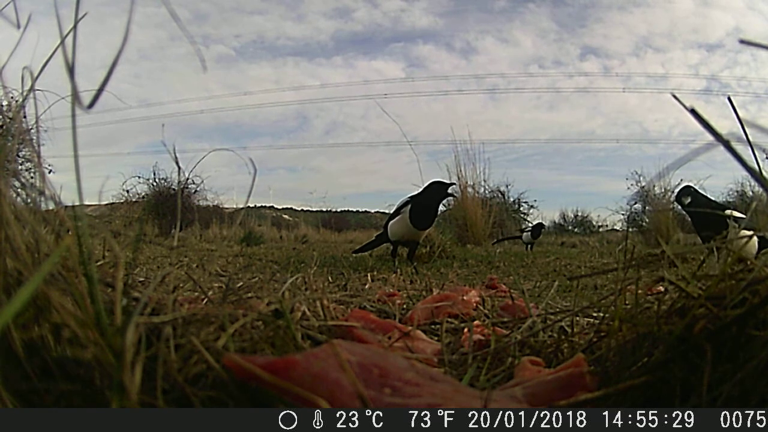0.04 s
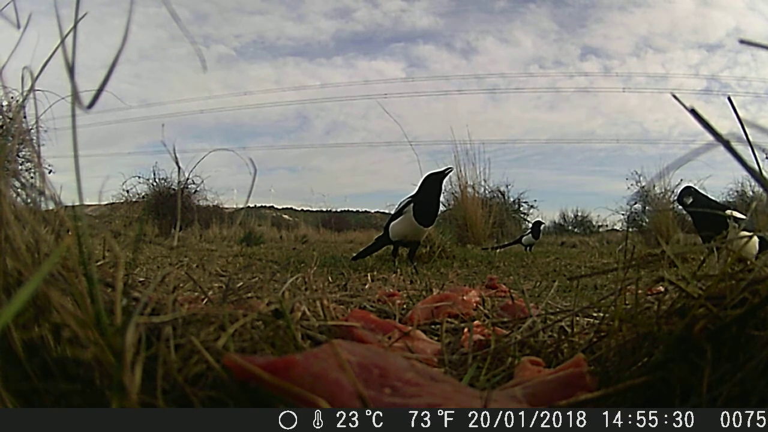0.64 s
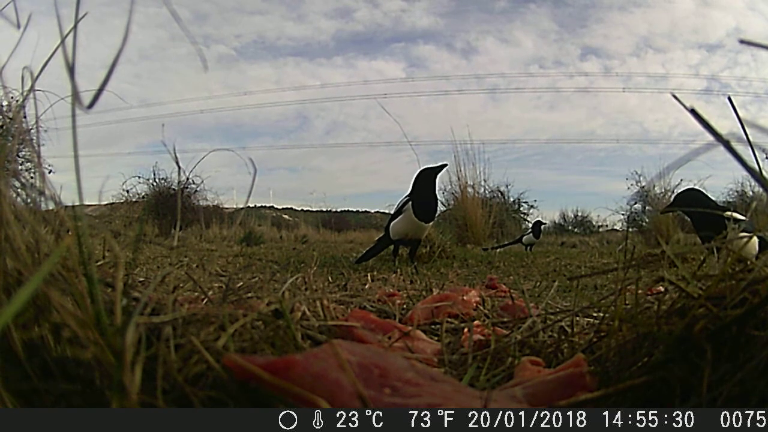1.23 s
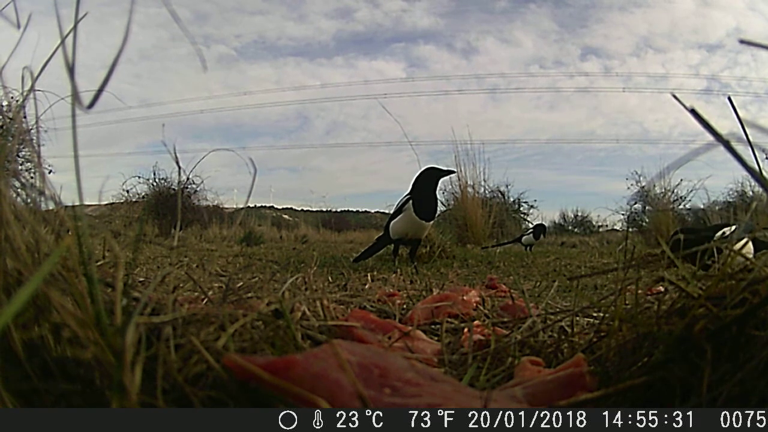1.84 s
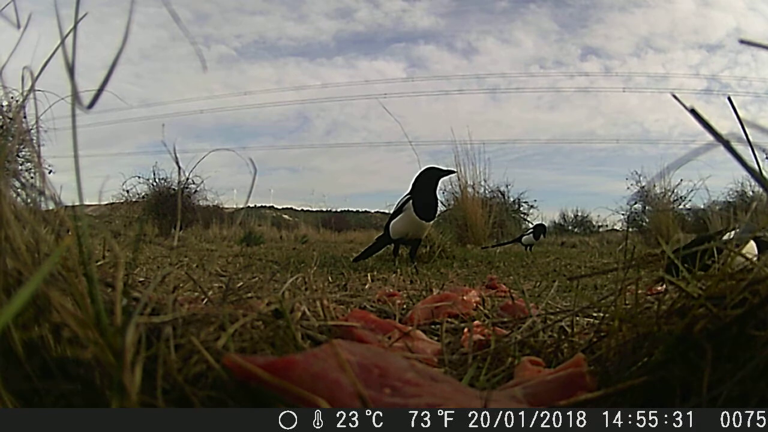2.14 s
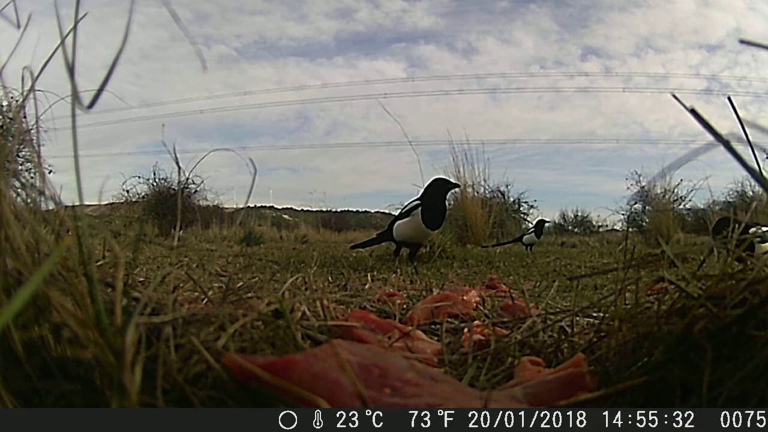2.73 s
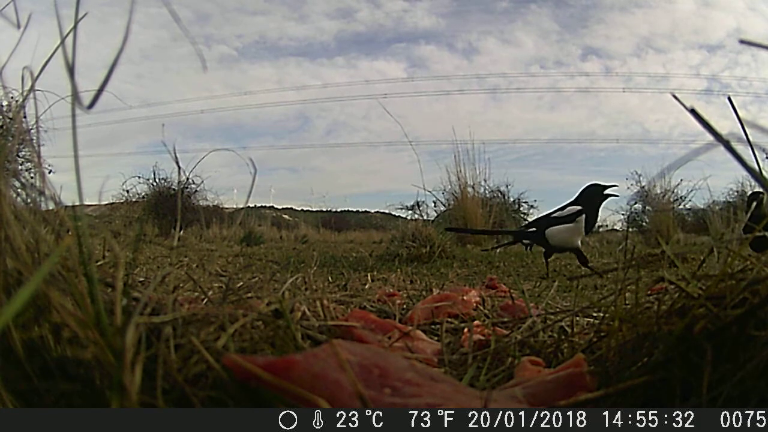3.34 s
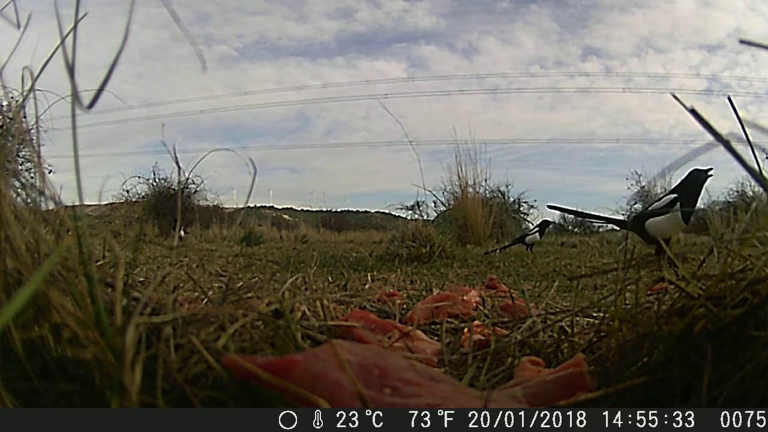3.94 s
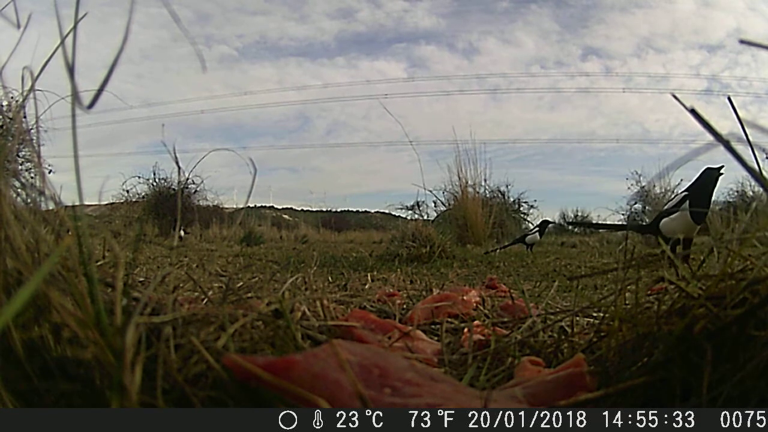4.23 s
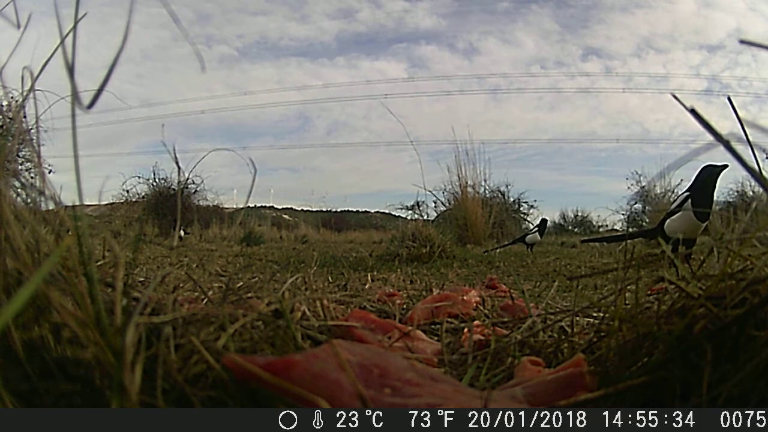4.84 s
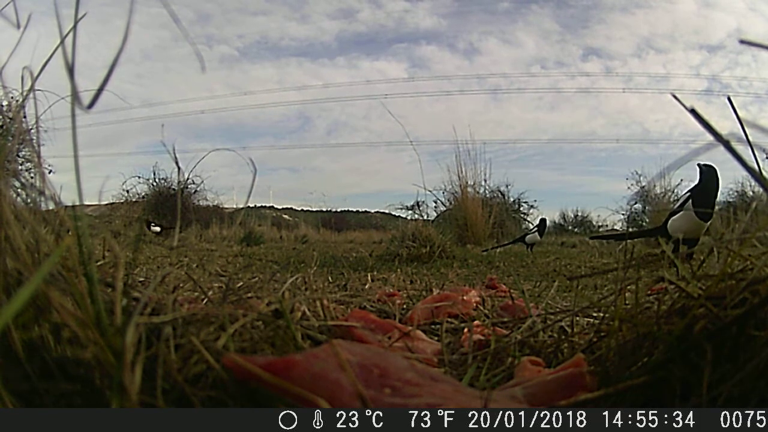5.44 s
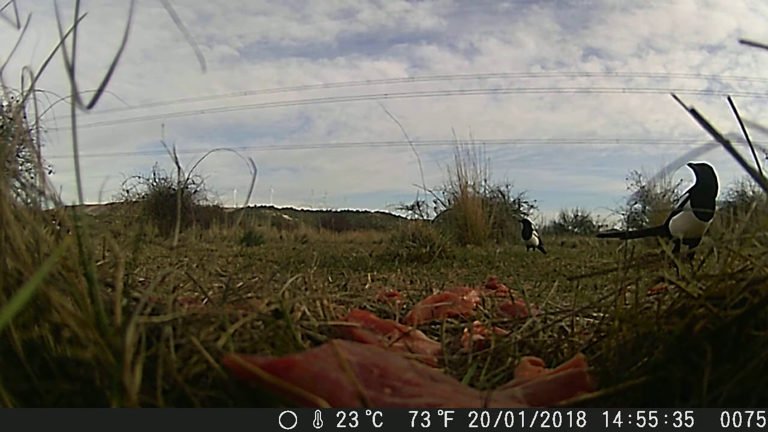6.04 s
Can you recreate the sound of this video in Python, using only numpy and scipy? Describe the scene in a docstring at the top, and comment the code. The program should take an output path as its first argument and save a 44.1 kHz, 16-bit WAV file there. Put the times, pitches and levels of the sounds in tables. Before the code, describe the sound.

Close, raspy magpie chatter comes in two rapid runs, the second longer, with only faint hiss and hum between them.

```python
"""Magpie in an open field

A magpie chatters close to a trail camera lying in the grass. Each note is a harsh rasp: uneven pulses
from the syrinx excite the resonances of throat and beak. Far bushes return faint echoes, and dry
stalks tick underfoot. The camera adds its own hiss, a low hum, and a soft fizzing tick five times
a second as it stores data."""
import sys
import numpy as np
from scipy import signal
from scipy.fft import rfft, irfft
from scipy.io import wavfile
from scipy.ndimage import uniform_filter1d

SR = 44100
rng = np.random.default_rng(int(sys.argv[2]) if len(sys.argv) > 2 else 0)


def inscribe(sig):
    """Save sig as 16-bit PCM at rate SR to the path in sys.argv[1].

    A 1-D sig is mono; a 2-D sig holds one channel per row.
    Samples are clipped to [-1, 1] before scaling.
    """
    pcm = np.round(np.clip(np.atleast_2d(sig).T, -1, 1) * 32767)
    wavfile.write(sys.argv[1], SR, pcm.astype(np.int16))


N = 268634

# Spectral density of the hiss and rumble: f/Hz, level/dB
HISS_SPECTRUM = [(12, -76), (30, -76), (55, -86), (110, -91.5), (250, -99), (500, -103.5), (1000, -108),
                 (2600, -112), (3200, -121), (3600, -119), (5200, -123), (6600, -120), (7330, -111.5),
                 (7900, -123), (8700, -133)]
# Hum at harmonics of the camera's picture rate: f/Hz, level/dB
HUM_PARTIALS = [(30, -70), (60, -79), (90, -78), (120, -87.5), (150, -88.5), (180, -93), (210, -89),
                (270, -88.5)]
# Spectral peaks of the fizz while data is stored: f/Hz, width/Hz, gain/dB
FIZZ_PEAKS = [(3600, 500, -14.5), (4030, 98, -16.5), (4390, 170, -6.5), (5020, 140, -13),
              (5560, 190, -11.5), (7100, 280, -7.5), (7340, 220, 3), (8550, 360, -16)]
# Dry grass ticking under the bird's feet: t/s, level/dB
STALK_TICKS = [(1.479, -75.5), (5.047, -71), (5.066, -74), (5.145, -74), (5.236, -72)]
# Echoes from the bushes: delay/s, gain/dB
BUSH_ECHOES = [(.056, -24.5), (.143, -27.5)]
# Bands that the bushes reflect: f/Hz, width/Hz, gain/dB
BUSH_BANDS = [(750, 300, -10.5), (1410, 360, -1), (2226, 120, 7), (2690, 120, -6), (4500, 2700, -10.5)]
# The echoes grow as the bird walks off and turns away: t/s, gain/dB
ECHO_GROWTH = [(3.6, -4), (4.44, 1.5)]
# Bands cancelled by reflections off the ground and the housing: f/Hz, width/Hz
NOTCHES = [(1600, 170), (3200, 237), (6400, 520)]
# Fixed resonances of throat and beak: f/Hz, width/Hz, gain/dB
FORMANTS = [(665, 120, -9), (785, 100, -5.5), (1080, 100, -17), (1295, 130, -4.5), (1765, 80, -12),
            (1950, 110, -10.3), (2195, 90, -6.5), (2450, 170, -3), (2880, 240, -4), (3450, 400, -12),
            (4160, 100, -14.5), (4520, 380, -14.5), (4850, 100, -16), (5080, 150, -14), (5500, 350, -19.5),
            (5980, 340, -14), (6700, 380, -12.5), (7400, 480, -16), (8300, 260, -29)]
# How the beak is held: t/s, main resonance f/Hz, gain of the low chest tones/dB
BEAK_POSTURE = [(.17, 2790, -1.9), (3.07, 2800, -2.4), (3.16, 2500, -1.3), (3.36, 2490, -4),
                (3.66, 2740, -2.5), (3.84, 2534, -5.5), (4.2, 2490, -5.5)]
# Treble as the bird moves its head: t/s, brightness/dB, further gain at the top edge/dB
HEAD_TREBLE = [(.5, 4, -1), (2.9, -1, -3.5), (3.16, 1.5, -7), (3.36, -5, -5.5), (3.56, -6.5, -7),
               (3.74, -1.1, -4), (3.84, -4, -0.5), (4.2, -2.5, -3)]
# Chest tones come sooner and linger, treble goes first: lower edge f/Hz, attack exponent, release/length
REGISTER_ENVELOPES = [(0, 0.71, 0.25), (1600, 0.9, 0.19), (3200, 0.97, 0.17)]
# Notes of the chatter: envelope peak t/s, length/s, level/dB
CHATTER = [(-.015, 0.062, -43.5), (.079, 0.065, -45.5), (.172, 0.064, -46.5), (.245, 0.062, -64),
           (0.326, .066, -63.5), (.413, 0.057, -62.5), (0.511, 0.072, -63), (2.91, 0.061, -49.5),
           (2.991, 0.063, -48), (3.075, 0.073, -49.5), (3.163, 0.065, -48.5), (3.253, .069, -48),
           (3.361, .06, -47), (3.399, .035, -65), (3.471, 0.067, -65), (3.557, 0.068, -51.5),
           (3.645, 0.069, -48.5), (3.741, .068, -47.5), (3.84, .069, -45), (3.904, 0.053, -64),
           (4.037, 0.063, -47), (4.126, 0.069, -45), (4.222, 0.069, -44.5), (4.324, .067, -44),
           (4.442, 0.067, -44.5)]


def gain_of(db):
    """Amplitude ratio of a level in decibels."""
    return 10 ** (np.asarray(db) / 20)


def unit_rms(x):
    """Normalisation to an rms of 1."""
    return x / np.sqrt(np.mean(x ** 2) + 1e-20)


def spectrum_gain(points, hz):
    """Amplitude from levels interpolated on a logarithmic frequency axis."""
    f, db = np.transpose(points)
    return gain_of(np.interp(np.log(hz + 1), np.log(f + 1), db))


def follow(curve, s):
    """Linear interpolation of each column of a control curve at time s."""
    times, *columns = np.transpose(curve)
    return [np.interp(s, times, column) for column in columns]


def add(mix, s, sound):
    """Superposition of a sound on the mix, starting at time s."""
    start = round(s * SR)
    sound = sound[max(-start, 0):]
    part = mix[max(start, 0):][:len(sound)]
    part += sound[:len(part)]


def resonances(modes, hz):
    """Gain of steep-sided resonances whose powers add."""
    powers = (gain_of(db) ** 2 / (1 + ((hz - f) / (.78 * width)) ** 2) ** 2 for f, width, db in modes)
    return np.sqrt(sum(powers))


def colour(x, gain_at, size=4096):
    """Minimum-phase filter of gain gain_at(f): it rings after each pulse, never before."""
    hz = abs(np.fft.fftfreq(size, 1 / SR))
    log_gain = np.log(np.maximum(gain_at(hz), 1e-5))
    taps = np.fft.ifft(np.exp(np.conj(signal.hilbert(log_gain)))).real
    return signal.fftconvolve(x, taps[:size // 2])[:len(x)]


def wobble(samples, rate_hz):
    """Random fluctuation of rms 1, low-passed near rate_hz."""
    hz = np.fft.rfftfreq(samples, 1 / SR)
    return unit_rms(irfft(rfft(rng.standard_normal(samples)) * np.exp(-(hz / rate_hz) ** 2), samples))


def hiss_and_hum(hiss_db=-.2, waver_db=.25, whine_hz=6335, whine_db=-98):
    """A continuous noise spectrum from air and microphone, plus spectral lines of hum and whine."""
    hz, t = np.fft.rfftfreq(N, 1 / SR), np.arange(N) / SR
    noise = irfft(rfft(rng.standard_normal(N)) * spectrum_gain(HISS_SPECTRUM, hz), N) * np.sqrt(SR / 2)
    tones = sum(np.sqrt(2) * gain_of(db) * np.sin(2 * np.pi * (f * t + rng.random()))
                for f, db in HUM_PARTIALS + [(whine_hz, whine_db)])
    return noise * gain_of(hiss_db + waver_db * wobble(N, 6)) + tones


def data_bursts(first_s=.186, period_s=.2, pip_hz=4420, pip_decay_s=.0037,
                fizz_db=-77, pip_db=-76, sag_db=-52):
    """Periodic loading: each write pips, fizzes and pulls down the supply, which then swings back."""
    busy, pips, t = np.zeros(N), np.zeros(N), np.arange(SR // 20) / SR
    for s in np.arange(first_s - period_s, N / SR, period_s):
        length_s = (.037 if 4.5 < s < 5.1 else .066) + .008 * rng.uniform(-1.1, 1)
        add(busy, s, np.ones(int(SR * length_s)))
        add(pips, s, np.sin(2 * np.pi * pip_hz * t) * np.exp(-t / pip_decay_s))
    noise = unit_rms(colour(rng.standard_normal(N), lambda hz: resonances(FIZZ_PEAKS, hz)))
    fizz = uniform_filter1d(busy, size=200) * noise
    supply_response = signal.butter(1, [4.6, 16], "band", fs=SR, output="sos")
    sag = signal.sosfilt(supply_response, -uniform_filter1d(busy, size=500))
    return gain_of(fizz_db) * fizz + gain_of(pip_db) * pips + gain_of(sag_db) * unit_rms(sag)


def grass_ticks(decay_s=.007):
    """Broadband transients: dry stalks give tiny bright crackles that decay exponentially."""
    out, t = np.zeros(N), np.arange(SR // 20) / SR
    crisp = [(2000, -14), (4400, -12.5), (6200, -15), (7400, 1), (8500, -20.5)]  # f/Hz, gain/dB
    envelope = t / decay_s * np.exp(1 - t / decay_s)
    for s, db in STALK_TICKS:
        snap = unit_rms(colour(rng.standard_normal(len(t)), lambda hz: spectrum_gain(crisp, hz)))
        add(out, s - decay_s / 2, gain_of(db) * snap * envelope)
    return out


def field_echoes(x, scatter_s=.003, wash_db=-35, t60_s=.28):
    """Diffuse reflection: bushes return dull, smeared echoes over a thin wash from the grass."""
    t = np.arange(SR // 2) / SR
    response = gain_of(wash_db - 60 * t / t60_s) * rng.standard_normal(len(t))
    response *= np.sqrt(np.log(1e6) / t60_s / SR)  # wash energy independent of decay time
    for delay, db in BUSH_ECHOES:
        twigs = rng.standard_normal(len(t)) * np.exp(-t / scatter_s)
        add(response, delay, gain_of(db) * ((t == 0) + .5 * twigs / np.linalg.norm(twigs)))
    incident = x * gain_of(follow(ECHO_GROWTH, np.arange(N) / SR)[0])
    return colour(signal.fftconvolve(incident, response)[:N], lambda hz: resonances(BUSH_BANDS, hz))


def through_grass(x, scatter_db=-2, scatter_s=.0015):
    """Multipath scattering by stalks blurs the pulses but largely keeps their colour."""
    t = np.arange(len(x)) / SR
    stalks = rng.standard_normal(len(t)) * np.exp(-t / scatter_s)
    path = rfft((t == 0) + gain_of(scatter_db) * stalks / np.linalg.norm(stalks))
    return irfft(rfft(x) * path / np.hypot(abs(path), .25), len(x))


def syrinx(place, pitch_hz=680, arch=.7, jitter=.24, air_share=.49, flutter_db=1.33, flutter_hz=320):
    """Modulated airflow: uneven, fluttering pulses, each with a puff of air, arch in rate over a note."""
    samples = len(place)
    rate_hz = pitch_hz * np.exp(jitter * wobble(samples, 500) - arch * place ** 2)
    cycles = np.cumsum(rate_hz) / SR + rng.random()
    pulses = np.diff(np.floor(cycles), prepend=0)
    puffs = np.exp(-(cycles % 1) / .44) * rng.standard_normal(samples)
    drive = np.sqrt(1 - air_share) * unit_rms(pulses - pulses.mean())
    drive += np.sqrt(air_share) * unit_rms(puffs)
    return drive * gain_of(flutter_db * wobble(samples, flutter_hz))


def swell(x, place, attack_share=.58, release_power=1.54):
    """Amplitude envelope: each register rises with the air pressure, then dies away ever faster."""
    edges_hz = [row[0] for row in REGISTER_ENVELOPES[1:]]
    register = np.digitize(np.fft.rfftfreq(len(x), 1 / SR), edges_hz)
    rise, after = np.clip(1 + place / attack_share, 0, 1), np.maximum(place, 0)
    out = np.zeros(len(x))
    for k, (_, power, release) in enumerate(REGISTER_ENVELOPES):
        band = irfft(rfft(x) * (register == k), len(x))
        out += band * rise ** power * np.exp(-(after / release) ** release_power)
    return out


def vocal_tract(hz, s, beak_width_hz=125, leak_db=-36):
    """Formant gain of throat and half-open beak, tilted by the bird's posture at time s."""
    beak_hz, chest_db = follow(BEAK_POSTURE, s)
    bright_db, edge_db = follow(HEAD_TREBLE, s)
    tilt = [(1400, chest_db), (2100, 0), (3000, 0),
            (3700, bright_db), (6100, bright_db), (7000, bright_db + edge_db)]
    modes = FORMANTS + [(beak_hz, beak_width_hz, 0)]
    return (resonances(modes, hz) + gain_of(leak_db - hz / 300)) * spectrum_gain(tilt, hz)


def rasp(s, length_s, db):
    """Source and filter: the syrinx drives the vocal tract. Returns one note's start time and sound."""
    t = np.arange(-.055, .07, 1 / SR)
    place = t / length_s  # note lengths from the envelope peak
    drive = swell(syrinx(place), place)
    voice = colour(drive, lambda hz: vocal_tract(hz, s))
    duty = length_s * SR / len(t)  # refers the level to the note's own length
    return s + t[0], gain_of(db) * unit_rms(through_grass(voice)) * np.sqrt(duty)


def magpie(notch_floor=.026):
    """The run of rasps, notched by destructive interference on the way to the microphone."""
    def interference(hz):
        dips = [abs(hz - f) / np.hypot(hz - f, width / 2) for f, width in NOTCHES]
        return np.prod(dips, axis=0) + notch_floor

    out = np.zeros(N)
    for note in CHATTER:
        add(out, *rasp(*note))
    return colour(out, interference)


def scene():
    """Superposition of the bird, its echoes, the grass and the camera's own noises, in mono."""
    bird = magpie()
    return (bird + field_echoes(bird) + grass_ticks() + hiss_and_hum() + data_bursts())[None]


def record(dry, cutoff_hz=8780):
    """Band limiting: the camera acts as a steep low-pass filter."""
    lowpass = signal.firwin(301, cutoff_hz, window=("kaiser", 9), fs=SR)
    return signal.oaconvolve(dry, lowpass[None], "same")


dry = scene()
out = record(dry)
inscribe(out)
```